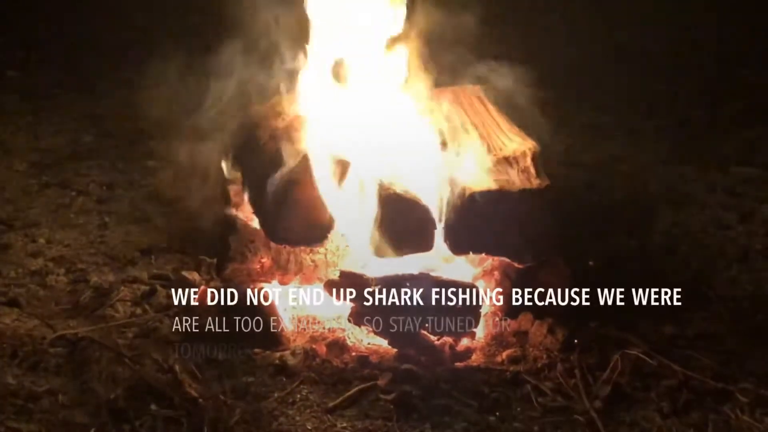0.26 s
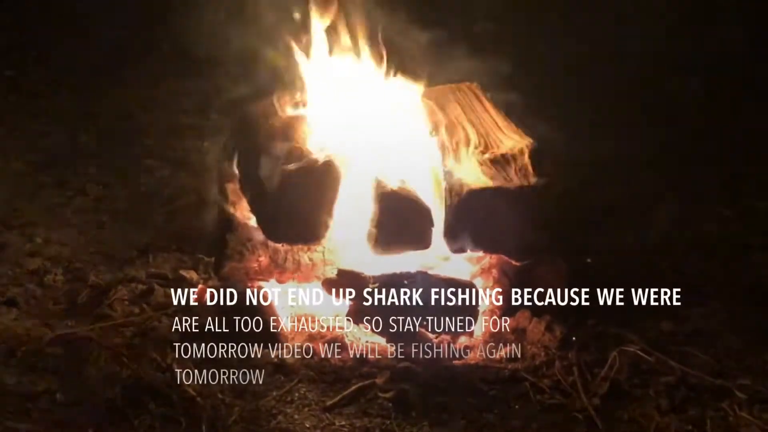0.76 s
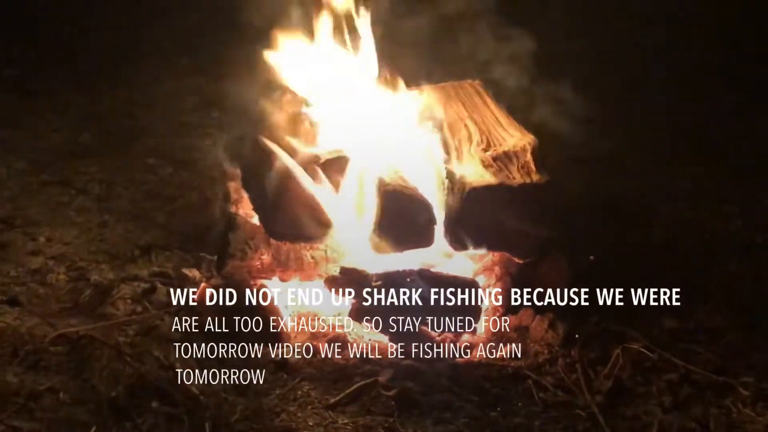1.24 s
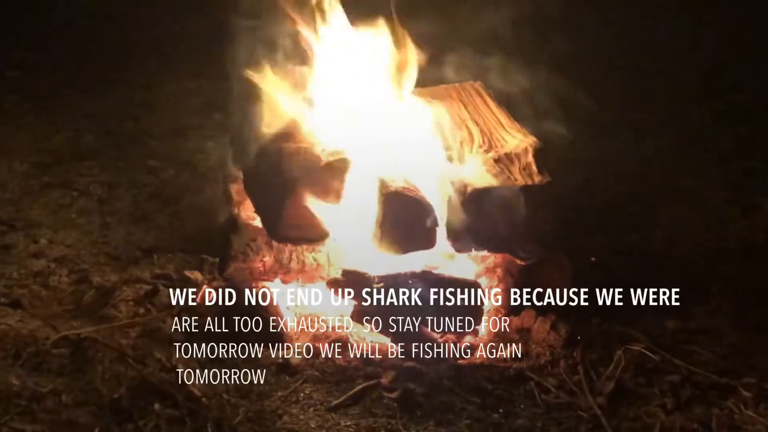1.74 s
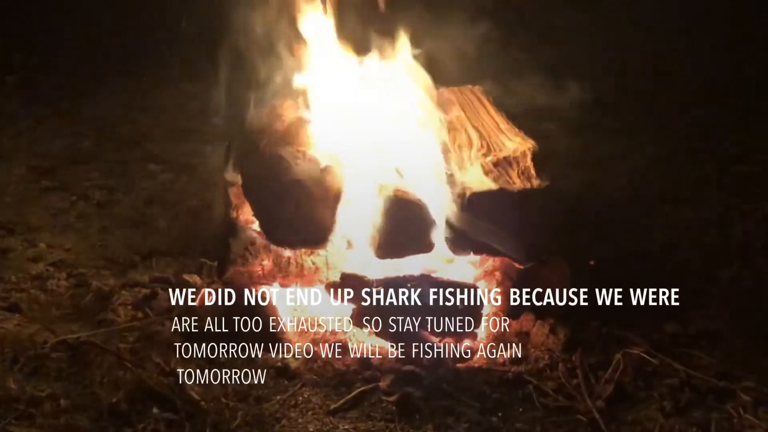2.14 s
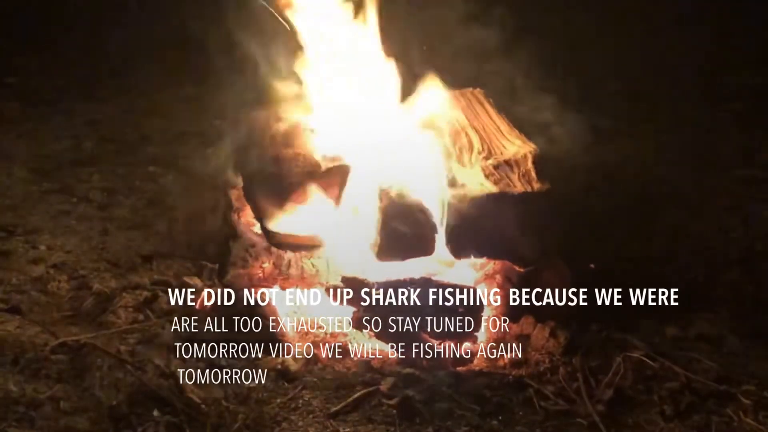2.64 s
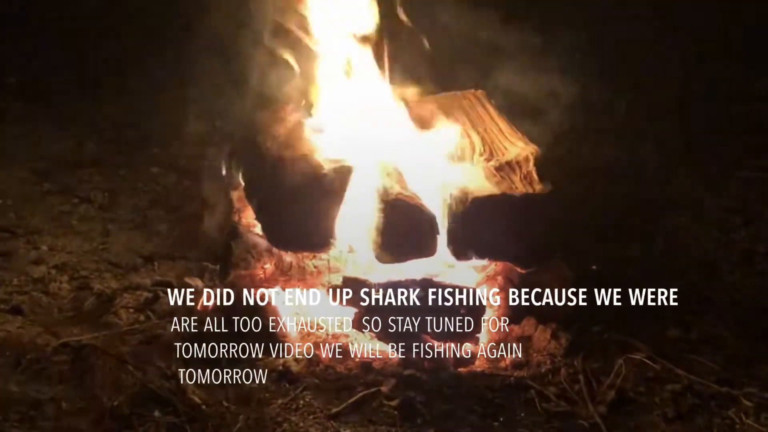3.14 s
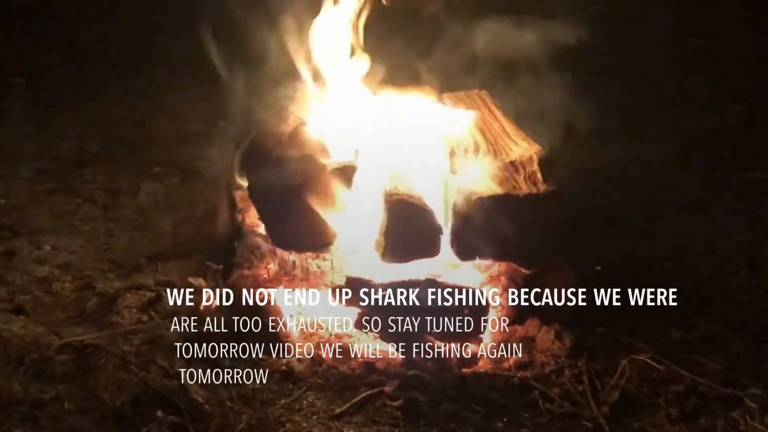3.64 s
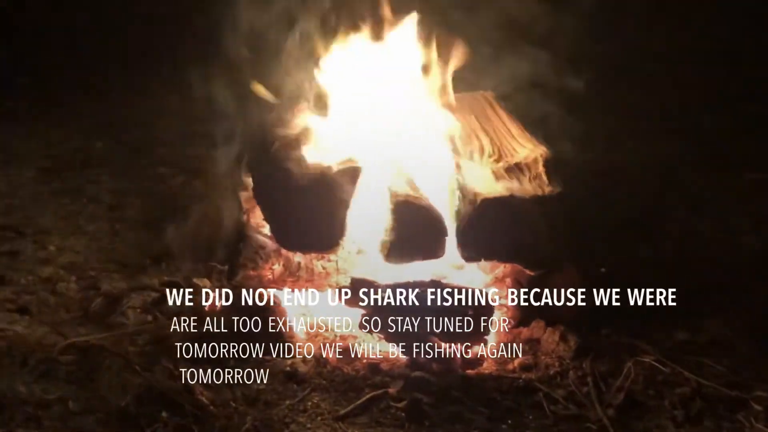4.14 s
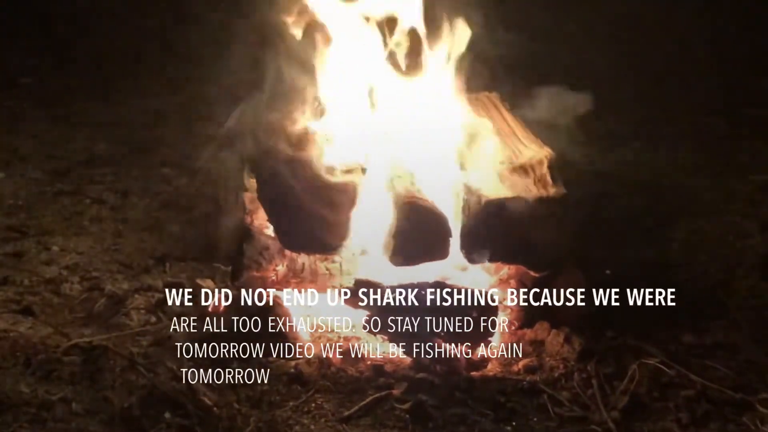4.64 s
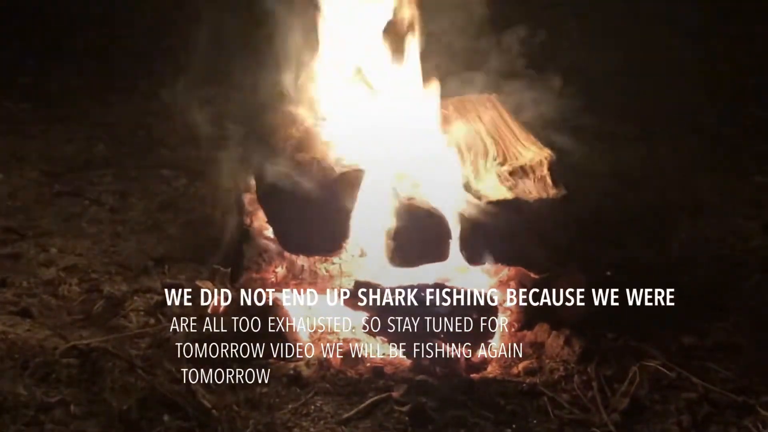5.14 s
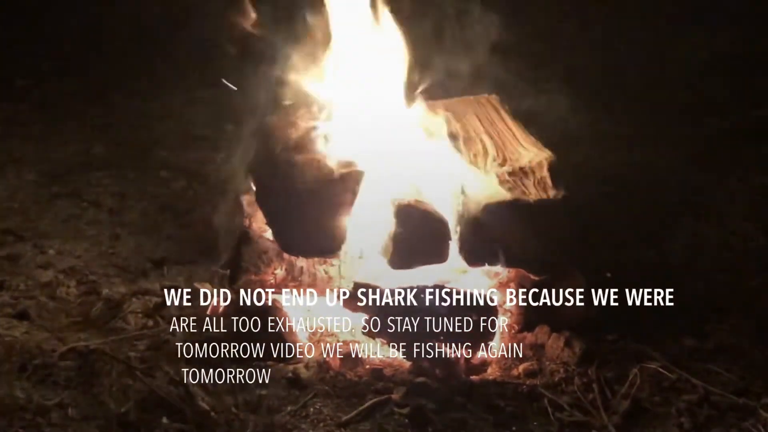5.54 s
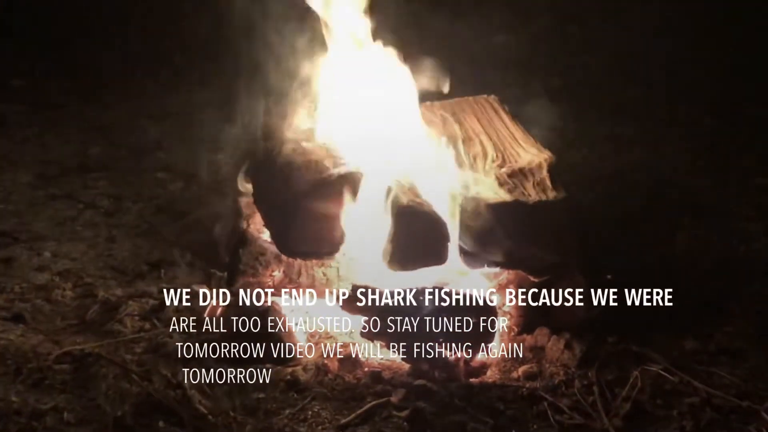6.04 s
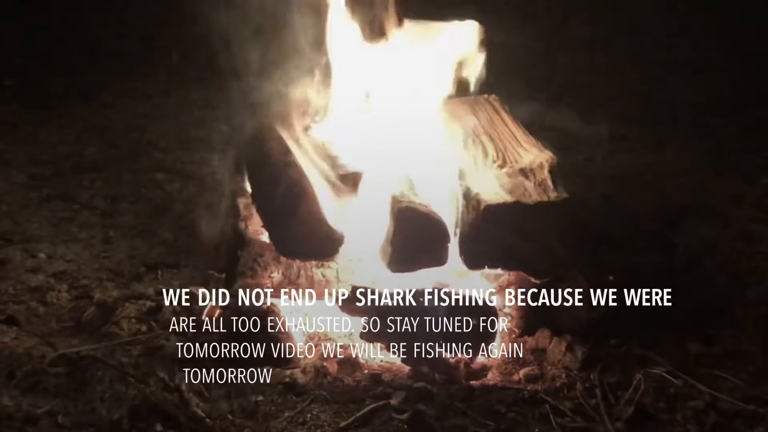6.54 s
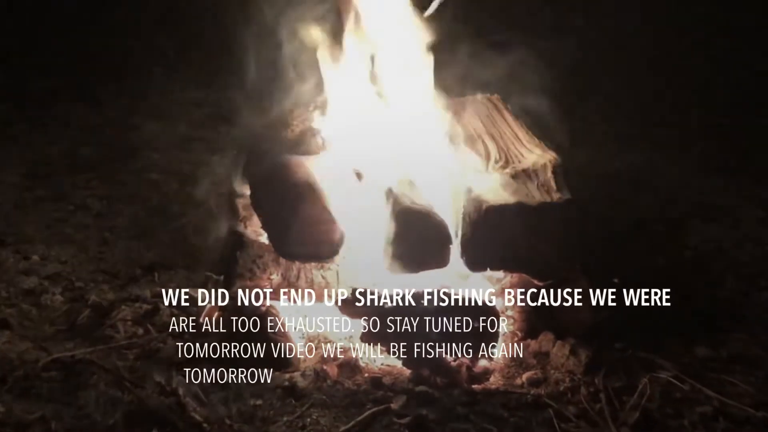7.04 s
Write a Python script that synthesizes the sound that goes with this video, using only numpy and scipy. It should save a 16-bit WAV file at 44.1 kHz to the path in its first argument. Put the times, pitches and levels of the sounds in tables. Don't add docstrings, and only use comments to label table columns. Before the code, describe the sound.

A wood campfire outdoors at night, heard by a small close microphone. A near cricket sings bursts of rapid, pure high chirps, with fainter crickets answering and a blurred far chorus behind. Low flame flutter and soft hiss continue beneath irregular bright pops and tiny ticks. Near the end a heel scuffs dry litter, cloth swishes, a sole drags over grit, and one very loud pop snaps.

```python
import sys
import numpy as np
from scipy import signal
from scipy.io import wavfile
from scipy.ndimage import uniform_filter1d

SR = 44100
rng = np.random.default_rng(int(sys.argv[2]) if len(sys.argv) > 2 else 0)


def master_out(mix):
    frames = np.transpose(np.atleast_2d(mix))
    ceiling = np.clip(frames, -1, 1)
    pcm = np.round(ceiling * 32767).astype(np.int16)
    wavfile.write(sys.argv[1], SR, pcm)


def gain_from_decibels(decibels):
    exponent = np.asarray(decibels, float) / 20
    return 10 ** exponent


N = 321043


def evened(x):
    return x / np.sqrt(np.mean(x ** 2) + 1e-20)


def read(points, hz):
    f, value = np.transpose(points)
    return np.interp(np.log(hz + 1), np.log(f + 1), value)


def level(rows):
    s, db = np.transpose(rows)
    return gain_from_decibels(np.interp(np.arange(N) / SR, s, db, left=-120, right=-120))


def add(mix, s, sound):
    at = round(s * SR)
    sound = sound[max(-at, 0):]
    part = mix[max(at, 0):][:len(sound)]
    part += sound[:len(part)]


def band(x, lo_hz, hi_hz):
    edges = [lo_hz, min(hi_hz, .49 * SR)]
    return signal.sosfilt(signal.butter(2, edges, "band", fs=SR, output="sos"), x)


def noise(spectrum, patchy_db, flicker_db, size=512):
    hz = np.fft.rfftfreq(size, 1 / SR)
    a, b, patches = rng.standard_normal((N * 4 // size + 5, len(hz), 3)).T
    patches = uniform_filter1d(patches, size=8, axis=0)
    patches = evened(uniform_filter1d(patches, size=12, axis=1))
    flicker = evened(uniform_filter1d(rng.standard_normal(a.shape[1]), size=6))
    gain = gain_from_decibels(read(spectrum, hz)[:, None] + patchy_db * patches + flicker_db * flicker)
    z = (a + 1j * b) * gain
    return evened(signal.istft(z, nperseg=size, noverlap=size * 3 // 4)[1][:N])


def gesture(start, attack, hold, release, db):
    t = np.arange(N) / SR - start
    corners = np.cumsum([0, attack, hold, release])
    short = np.interp(t, corners, [1, 0, 0, 1], left=9, right=9)
    return gain_from_decibels(db - 22 * short ** 2)


def stroke(hz, length, edge, sag_hz, droop_hz=0, swell_db=0, stray_hz=16):
    t = np.arange(round(length * SR)) / SR
    phase, detune = rng.random(2)
    steady = (hz + stray_hz * (detune - .5)) * t
    sag = sag_hz * (t / length - 1) * t / 2
    droop = droop_hz * t * (t / length) ** 4 / 5
    turns = steady - sag - droop + phase
    shape = signal.windows.tukey(len(t), np.clip(edge, 0, 1)) * gain_from_decibels(swell_db * (t / length - .5))
    return np.sqrt(2) * np.sin(2 * np.pi * turns) * shape


def sing(calls, offsets, **wing):
    out = np.zeros(N)
    for s, db in calls:
        for after, change_db in offsets:
            add(out, s + after, gain_from_decibels(db + change_db) * stroke(**wing))
    return out


def trill(s, db, period, chirps, uneven_db):
    return [(s + k * period, db + uneven_db * rng.standard_normal()) for k in range(round(chirps))]


def trills(rows, uneven_db):
    return [chirp for row in rows for chirp in trill(*row, uneven_db=uneven_db)]


def bushes(x, t60, count):
    t = np.arange(count) / SR
    tail = rng.standard_normal(count) * gain_from_decibels(-60 * t / t60) * (t > .003)
    return signal.oaconvolve(x, tail / np.linalg.norm(tail))[:N]


def near_cricket():
    # t/s, level/dB, period/s, chirps
    near_trills = [
        (-.031, -46.5, .063, 4),
        (.471, -45.7, .063, 1),
        (.861, -45.6, .0624, 6),
        (1.475, -46, .063, 10),
        (2.428, -45.7, .0631, 12),
        (3.604, -45.2, .0627, 7),
        (4.921, -45.5, .0631, 13),
        (6.122, -47, .063, 1),
        (6.18, -46.7, .063, 10),
        (7.072, -47.5, .0627, 4),
    ]
    near = sing(trills(near_trills, uneven_db=.2), [(-.0015, 1.0), (.0188, 1.3)],
                hz=6006, length=.018, edge=.82, sag_hz=4, droop_hz=105, swell_db=2.5)
    return near + gain_from_decibels(-11.5) * bushes(near, .38, count=9000)


def neighbours():
    # t/s, level/dB, period/s, calls
    high_bouts = [
        (.125, -63.4, .367, 5),
        (1.933, -63.2, .328, 2),
        (2.66, -62.8, .325, 5),
        (4.303, -64.6, .341, 4),
        (5.691, -66, .341, 5),
    ]
    high = sing(trills(high_bouts, uneven_db=1), [(-.015, 1.5), (.042, -.5)],
                hz=6392, length=.03, edge=.95, sag_hz=20)
    # t/s, level/dB
    middle_calls = [(0.308, -55.5), (0.731, -61), (1.12, -58), (1.525, -63), (1.971, -59), (2.313, -73.5),
                    (2.714, -62.5), (3.1, -58), (3.442, -65), (3.838, -64), (4.195, -60.6), (4.549, -57),
                    (5.19, -57), (5.506, -57), (5.836, -56.7), (6.235, -60), (6.567, -63.1), (6.917, -61),
                    (7.221, -57.9)]
    already_begun = [(-.064, -69)]
    middle = sing(already_begun + middle_calls, [(-.018, -1.4), (.04, -1.8)],
                  hz=6270, length=.03, edge=.45, sag_hz=60)
    # t/s, level/dB
    deep_calls = [(0.29, -72), (0.694, -71), (1.125, -73), (1.556, -73), (1.988, -72), (2.408, -70),
                  (2.803, -71), (3.2, -66.5), (3.675, -73), (4.151, -70), (4.86, -73), (5.28, -72),
                  (5.69, -70)]
    three_by_three = [(k * .064 + j * .014 - .02, .8 - 2.5 * abs(j - 1)) for k in range(3) for j in range(3)]
    deep = sing(deep_calls, three_by_three, hz=4075, length=.015, edge=.7, sag_hz=90, stray_hz=40)
    deep = deep + .55 * bushes(deep, .2, count=9000)
    # t/s, level/dB, period/s, chirps
    low_trills = [
        (1.381, -57.5, .0649, 13),
        (5.74, -58.5, .0635, 18),
    ]
    low = sing(trills(low_trills, uneven_db=2), [(0, 0), (.021, 0)],
               hz=5772, length=.0155, edge=.7, sag_hz=30, droop_hz=150, stray_hz=40)
    others = high + middle + low + deep
    # t/s, level/dB, f/Hz
    stray_strokes = [(.69, -68, 5340), (1.09, -63, 5460), (1.26, -64, 5520), (1.32, -64, 5520),
                     (2.47, -69, 5300), (3.53, -68, 5380), (3.81, -68, 5360), (4.92, -71, 5350),
                     (5.32, -70, 5340)]
    for s, db, hz in stray_strokes:
        add(others, s, gain_from_decibels(db) * stroke(hz, length=.03, edge=.9, sag_hz=160))
    return others + gain_from_decibels(-8) * bushes(others, .3, count=9000)


def pop(db, hz, spray_db, body_db, draw):
    t = np.arange(len(draw)) / SR
    width = .00006 - .000004 * body_db
    spike = np.sin(2 * np.pi * hz * t) * np.exp(-((t / width - 1.5)) ** 2)

    spray_db = min(spray_db, 0)
    t60 = .003 + .013 * gain_from_decibels(spray_db)
    debris = evened(band(draw, .86 * hz, 1.14 * hz)) + .7 * evened(band(draw[::-1], 6500, 16000))
    decay = gain_from_decibels(spray_db - 5 - 60 * t / t60) + gain_from_decibels(-36 - 60 * t / .063)
    spray = debris * decay * np.minimum(t / .00013, 1)

    body_hz = 5600 - 800 * gain_from_decibels(body_db)
    knock = np.append(1, draw[1:] * gain_from_decibels(-18 - 60 * t[1:] / .011))
    body = band(knock, .64 * body_hz, 1.2 * body_hz)
    body = body + .5 * band(t == 0, 1680, .7 * body_hz + 700)

    direct = spike + spray + gain_from_decibels(body_db + 1.5) * body / abs(body).max()
    lag = 12 + int(14 * min(abs(draw[-1]), 2))
    bounce = np.append(np.zeros(lag), direct[:-lag])
    return gain_from_decibels(db + 1.5) * (direct + .5 * bounce)


def pops():
    # t/s, peak level/dB, ring f/Hz, spray re peak/dB, body re peak/dB
    bursts = [(.405, -35, 9500, -6, -.5), (.447, -36, 10500, -3, -3), (.7625, -32, 12500, -3.5, -9),
              (.823, -35, 12200, -10, -2.5), (1.2727, -28, 12500, -10, -16.5),
              (1.5872, -29, 10100, -6, -16), (1.688, -33, 15400, -.5, -16), (2.028, -35.7, 14000, -7, -19),
              (2.0785, -28, 12200, -9, -15), (2.1652, -33, 13100, -.5, -17),
              (2.6935, -24.5, 11700, -13, -20), (3.7267, -23, 11900, -8, -16),
              (3.8834, -34, 12100, -18, -13.5), (4.6073, -44, 13900, -23, -17),
              (4.7296, -25, 9800, -14, -18), (4.7308, -24.5, 10800, -7.5, -14),
              (5.0937, -29.5, 13900, -9, -16.5), (5.8278, -36.5, 13300, -6, -11),
              (6.2274, -23.5, 11300, -11, -34), (6.5, -34.5, 11900, -9, -26),
              (6.6387, -33, 10600, -6.5, -21), (7.0122, -34, 14000, -6, -2), (7.1781, -27, 10100, -9, -11),
              (7.2213, -10.5, 12600, -12, -14)]
    # t/s, peak level/dB, ring f/Hz
    cracks = [(.151, -47, 11000), (.2236, -48, 7400), (.368, -51, 9300), (.4362, -39, 8500),
              (.4456, -43, 8900), (.8995, -46, 6000), (1.1944, -41, 7400), (1.5356, -40, 10000),
              (1.647, -37, 11800), (1.6945, -47, 14100), (1.97, -43, 11400), (2.0527, -41, 13800),
              (2.0837, -40, 11600), (2.1153, -41, 8900), (2.3554, -51, 10500), (2.8244, -46, 11900),
              (3.0741, -40, 13600), (3.4524, -36, 13200), (3.9038, -45, 7500), (4.1324, -43, 14100),
              (4.2419, -43, 9000), (4.31, -39, 7200), (4.5486, -44, 8650), (4.7158, -44, 14200),
              (4.9197, -43, 14200), (5.0013, -42, 12300), (6.1123, -54, 12300), (6.1944, -50, 11500),
              (6.4972, -42, 11600)]
    # t/s, peak level/dB, ring f/Hz
    splinters = [(.1607, -50, 11200), (.1988, -44, 8950), (.2758, -42, 12000), (.2785, -48, 12000),
                 (.731, -44, 12200), (1.3134, -43, 13400), (1.4641, -38, 11600), (1.467, -47, 13500),
                 (1.5281, -42, 11600), (1.6, -44, 12300), (2.3387, -46, 8700), (2.5357, -43, 13400),
                 (2.7168, -50, 11800), (3.1281, -49, 9400), (3.2499, -47, 12200), (3.436, -45, 12700),
                 (3.4606, -48.5, 13500), (3.5041, -49, 12300), (3.5629, -47, 13300), (3.5678, -45, 13400),
                 (3.7534, -45, 8300), (4.01, -43, 11000), (4.3555, -47, 11500), (4.439, -48, 9400),
                 (4.947, -50, 8350), (5.6434, -42, 13900), (5.7434, -46, 13900), (5.923, -47, 13100),
                 (5.9552, -40, 9200), (7.019, -36, 11000)]
    # t/s, peak level/dB, ring f/Hz
    twigs = [(2.585, -51, 13000), (2.887, -51, 9000), (3.234, -50, 12000), (3.517, -50, 12500),
             (2.1, -48, 13500), (6.462, -49, 11000), (.611, -50, 6500), (.988, -50, 7000),
             (1.848, -50, 9900), (1.983, -48, 9000), (2.16, -46, 13000), (2.01, -49, 9000),
             (2.872, -49, 7000), (3.003, -50, 7000), (3.047, -50, 7000)]
    events = list(bursts)
    for rows, spray_db, body_db in ((cracks, -7, -6), (splinters, -8, -20), (twigs, -12, -3)):
        events += [(*row, spray_db, body_db) for row in rows]
    out = np.zeros(N)
    for (s, *settings), draw in zip(events, rng.standard_normal((len(events), 1600))):
        add(out, s - .0001, pop(*settings, draw))
    return out


def thuds():
    # t/s, level/dB, f/Hz, length/s
    knocks = [(0.406, -49, 1300, 0.0025), (.405, -45, 2600, .002), (.823, -47, 2700, .002),
              (4.251, -51, 3500, .003), (4.31, -48, 1600, 0.0016), (4.321, -55, 3400, .003),
              (4.655, -51, 1700, 0.0045), (4.655, -55, 3130, .004), (4.657, -52, 2200, .003),
              (7.134, -46, 3800, .003), (7.134, -47, 4800, .003), (6.318, -44, 1510, 0.0017),
              (7.1335, -30, 1250, 0.0013), (7.164, -37, 1630, 0.0019), (7.218, -39, 1510, 0.0018)]
    out, t = np.zeros(N), np.arange(400) / SR
    for s, db, hz, length in knocks:
        grit = evened(band(rng.standard_normal(len(t)), .6 * hz, 2.2 * hz))
        grit = .3 * grit * np.exp(-t / (1.2 * length))
        knock = np.sin(2 * np.pi * hz * t) * np.exp(-(2 * t / length - 1.4) ** 2)
        add(out, s - .001, gain_from_decibels(db) * (knock + grit))
    return out


def rings():
    # t/s, peak level/dB, f/Hz
    slivers = [(.277, -45, 13000), (.353, -59, 9000), (.368, -52, 9500), (.368, -47, 3500),
               (.418, -54, 9200), (.748, -50, 4500), (.7625, -38, 5000), (.7625, -37, 8600),
               (1.1944, -45, 7400), (1.1944, -45, 14800), (1.1944, -42, 13300), (1.176, -52, 14500),
               (1.5872, -49, 5100), (1.5872, -40, 13300), (1.688, -50, 4400), (1.688, -37, 8500),
               (1.72, -54, 8200), (1.97, -45, 5200), (2.0785, -41, 7900), (2.0785, -47, 4400),
               (2.1652, -38, 6900), (3.0741, -47, 9900), (2.6935, -47, 3600), (2.6935, -40, 15500),
               (3.7267, -36, 7300), (3.7267, -33, 8900), (4.01, -46, 15400), (4.253, -49, 9600),
               (4.253, -50, 12500), (4.31, -42, 11900), (4.31, -43, 13500), (4.466, -51, 9800),
               (4.474, -52, 12500), (4.656, -50, 9300), (4.73, -35, 5300), (3.381, -50, 13400),
               (4.73, -38, 15200), (4.88, -52, 9000), (4.9197, -48, 7500), (4.9197, -48, 8800),
               (5.0013, -46, 12200), (5.0937, -45, 7400), (5.0937, -44, 8800), (5.346, -50, 13000),
               (5.394, -51, 9500), (5.464, -49, 8800), (5.51, -52, 12500), (5.709, -50, 10800),
               (5.923, -44, 13200), (5.93, -49, 9800), (6.113, -46, 12200), (6.135, -47, 13100),
               (6.6387, -33, 6900), (6.925, -53, 13200), (6.934, -48, 11700), (7.02, -41, 13600),
               (7.02, -37, 9200), (7.1781, -40, 14800), (7.193, -46, 7700), (7.2213, -27, 8500)]
    out, t = np.zeros(N), np.arange(900) / SR
    for (s, db, hz), (apart, phase) in zip(slivers, rng.random((len(slivers), 2))):
        first = np.sin(2 * np.pi * hz * t)
        second = np.sin(2 * np.pi * (hz * (.95 + .1 * apart) * t + phase))
        decay = gain_from_decibels(db - 60 * t / .011)
        add(out, s, decay * np.minimum(t / .0003, 1) * (first + .6 * second))
    return out


def ticks(per_s, db, spread_db):
    clumps = gain_from_decibels(7 * evened(band(rng.standard_normal(N), 1.6, 12)))
    chance = per_s / SR * clumps / clumps.mean()
    t, out = np.arange(90) / SR, np.zeros(N)
    for hz in (4800, 8200, 9800, 11500, 13000, 14400):
        strength = gain_from_decibels(spread_db * np.minimum(rng.exponential(1, N), 2.5))
        train = strength * (rng.random(N) < chance)
        snap = np.sin(2 * np.pi * hz * t) * np.exp(-t / .00028)
        out += signal.oaconvolve(train, snap)[:N]
    return gain_from_decibels(db) * out


def sap_and_steam():
    # start t/s, attack/s, hold/s, release/s, level/dB
    sap_fizz = (5.76, .1, .09, .05, -61)
    # t/s, level/dB, f/Hz, length/s, sag/Hz
    steam = (5.85, -58, 10200, .028, -1600)
    sputter = gain_from_decibels(4 * evened(band(rng.standard_normal(N), 15, 90)))
    fizz = band(rng.standard_normal(N), 9000, 14500) * sputter
    out = gesture(*sap_fizz) * evened(fizz) * gain_from_decibels(-4.5)
    s, db, hz, length, sag_hz = steam
    add(out, s, gain_from_decibels(db) * stroke(hz, length, edge=.8, sag_hz=sag_hz))
    return out


def fire():
    return pops() + thuds() + rings() + ticks(per_s=9, db=-58, spread_db=3) + sap_and_steam()


def walker():
    # start t/s, attack/s, hold/s, release/s, level/dB
    heel_move = (6.306, .005, .05, .05, -50)
    cloth_move = (6.39, .33, .06, .14, -51)
    drag_move = (7.035, .03, .15, .5, -52)
    weight_move = (7.06, .08, .015, .14, -47)
    # f/Hz, density level/dB per Hz
    litter = [(200, -16), (450, -1), (750, -4), (1800, -8), (2600, -10), (4400, -9.5), (5300, -18),
              (7000, -12), (9500, -20), (12000, -16), (15700, -17)]
    cloth = [(1200, -6), (3000, -7), (4100, -2), (5200, -2.5), (6900, 1), (9000, -5), (11000, -0.5),
             (12000, -5), (13600, -1.5), (14600, -4), (15800, -23)]
    ground = [(300, -27), (560, -9), (720, 5), (1450, 0.5), (2400, -2), (5000, -10.5), (8500, -16),
              (15700, -21)]
    # f/Hz, width/Hz, level/dB
    hollow_modes = [(425, 77, 0), (915, 120, -6), (1300, 35, -8), (1820, 97, -7), (2720, 33, -15),
                    (3130, 110, -14), (4350, 49, -13)]
    rub = rng.standard_normal(N)
    branch = sum(gain_from_decibels(db) * evened(band(rub, hz - width / 2, hz + width / 2)) for hz, width, db in hollow_modes)
    crunch = noise(litter, patchy_db=2.2, flicker_db=1, size=256)
    heel = gesture(*heel_move) * (crunch + gain_from_decibels(.5) * evened(branch))
    swish = gesture(*cloth_move) * noise(cloth, patchy_db=2.2, flicker_db=.7)
    force = np.sqrt(gesture(*drag_move) ** 2 + gesture(*weight_move) ** 2)
    drag = force * noise(ground, patchy_db=2, flicker_db=.6, size=256)
    return heel + swish + drag


def chorus(count=26):
    # t/s, level/dB
    swells = [(0.0, -56), (0.49, -60.5), (2.3, -60), (2.88, -61), (3.38, -63), (3.75, -58), (4.28, -63),
              (4.6, -59), (5.43, -65), (5.96, -60), (7.01, -61.5), (7.28, -55)]
    out = np.zeros(N)
    for pitch, start, size in rng.random((count, 3)):
        calls = []
        singer_db = -10 * size - 9 * (1.7 * pitch - 1) ** 2
        for s in np.arange(-start, N / SR, 1.05 + .5 * size):
            calls += trill(s, singer_db, .06 + .006 * pitch, 4 + 7 * start, uneven_db=.5)
        out += sing(calls, [(0, 0), (.021, 0)],
                    hz=5790 + 550 * pitch, length=.0155, edge=.7, sag_hz=30, droop_hz=150)
    far = 1.1 * out + bushes(out, .6, count=14000)
    return level(swells) * gain_from_decibels(1.2) * evened(far)


def air():
    # f/Hz, density level/dB per Hz
    air_spectrum = [(18, -50), (35, -33), (60, 2.5), (130, -0.5), (280, -8), (450, -16), (730, -24.5),
                    (1500, -29.5), (2700, -33.8), (5000, -34.5), (6600, -34), (7400, -39), (10000, -39.5),
                    (12200, -38.3), (15000, -39.5), (15800, -42), (16100, -53)]
    # t/s, level/dB
    roar_level = [
        (0.0, -49.5),
        (4.3, -49.5),
        (5.2, -48.8),
        (6.3, -49.5),
        (6.4, -48),
        (7, -48),
        (7.2, -45),
        (7.28, -52),
    ]
    # t/s, change/dB
    breeze = [
        (0, -.6),
        (3.2, -.6),
        (3.8, .5),
        (5.2, .9),
        (6.3, .5),
        (7.28, 0),
    ]
    both = noise(air_spectrum, patchy_db=1.1, flicker_db=.35, size=2048)
    roar = signal.sosfiltfilt(signal.butter(2, 450, fs=SR, output="sos"), both)
    flutter = evened(band(rng.standard_normal(N), 3.9, 35))
    hiss = level(breeze) * gain_from_decibels(-60.8) * evened(both - roar)
    return level(roar_level) * gain_from_decibels(1.7 * flutter) * roar + hiss


def scene():
    return (near_cricket() + neighbours() + fire() + walker() + chorus() + air())[None]


def roll_off(x):
    return signal.sosfilt(signal.butter(12, 17000, fs=SR, output="sos"), x)


def record(dry):
    thin = signal.sosfilt(signal.butter(2, 42, "high", fs=SR, output="sos"), dry)
    thin = .6 * np.tanh(thin / .6)
    main, leak = (signal.firwin(1023, hz, window=("kaiser", 9), fs=SR) for hz in (15850, 16650))
    edge = main + gain_from_decibels(-24) * (leak - main)
    return roll_off(signal.oaconvolve(thin, edge[None], "same"))


dry = scene()
out = record(dry)
master_out(out)
```